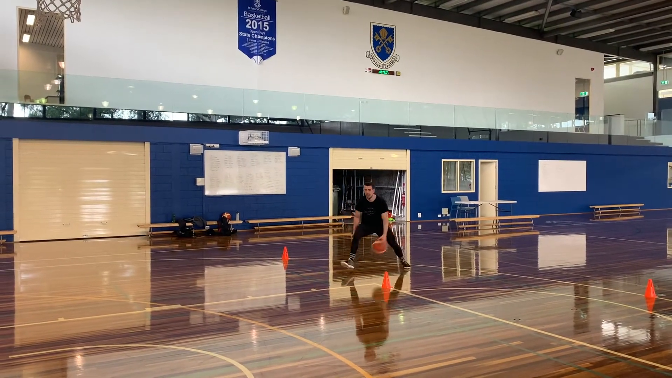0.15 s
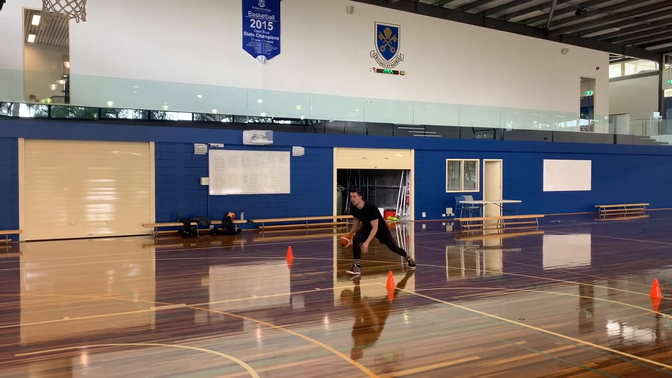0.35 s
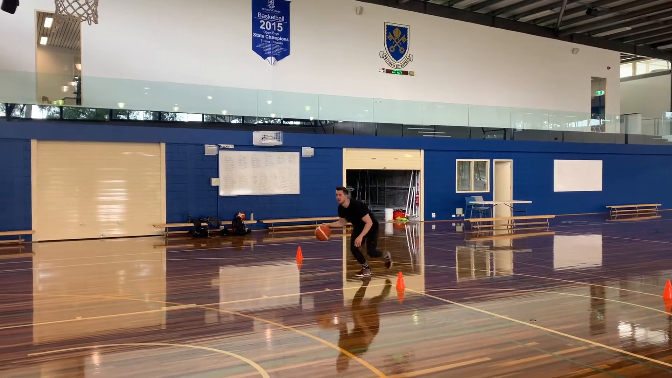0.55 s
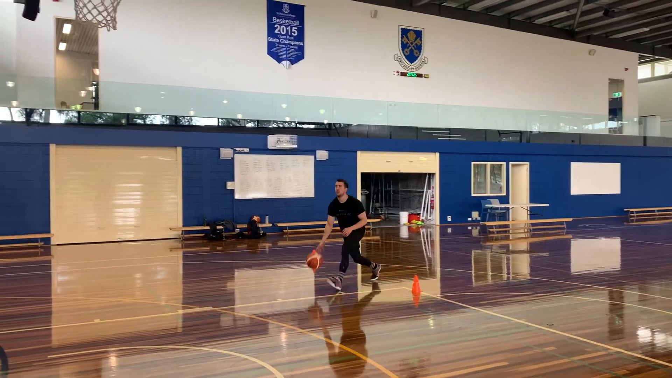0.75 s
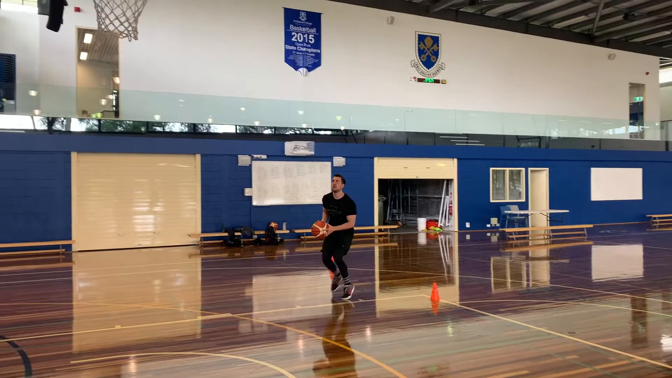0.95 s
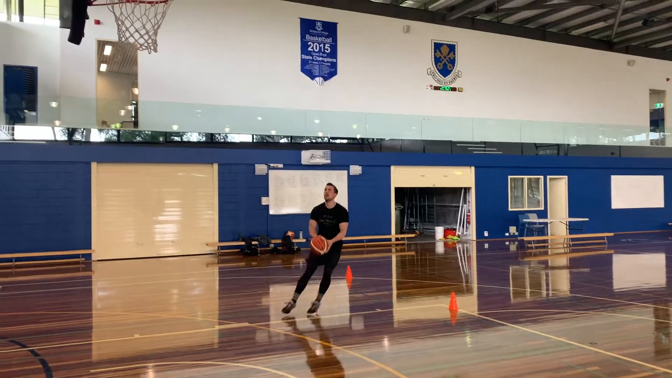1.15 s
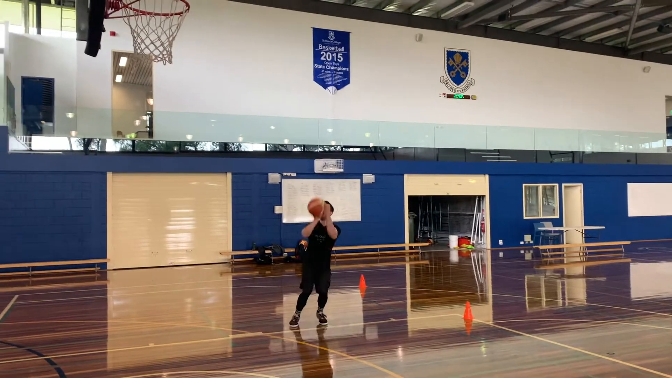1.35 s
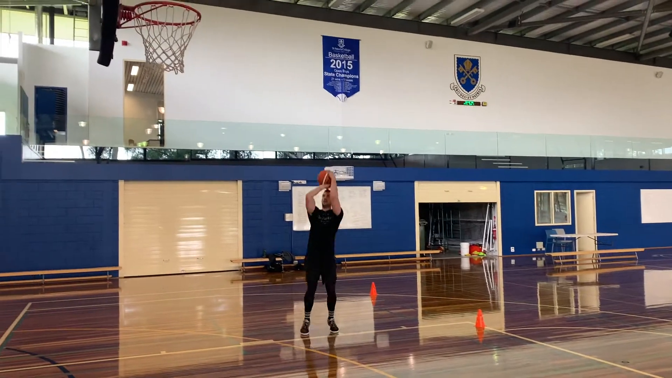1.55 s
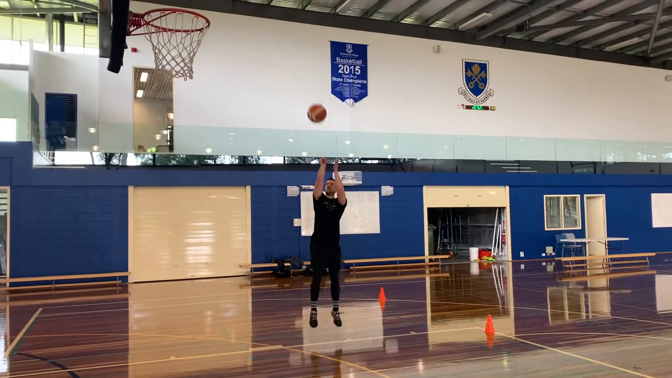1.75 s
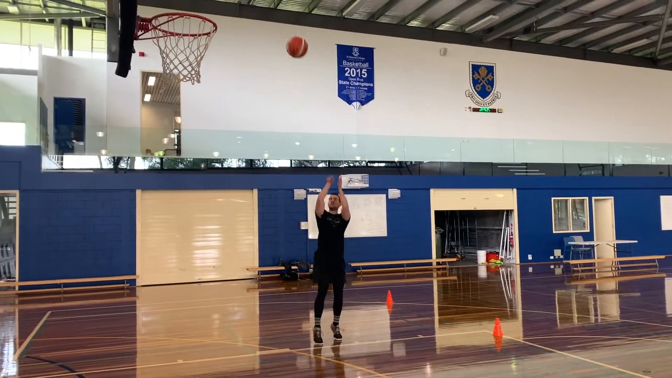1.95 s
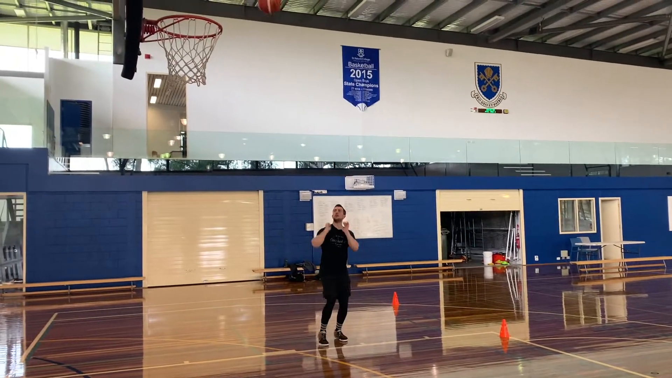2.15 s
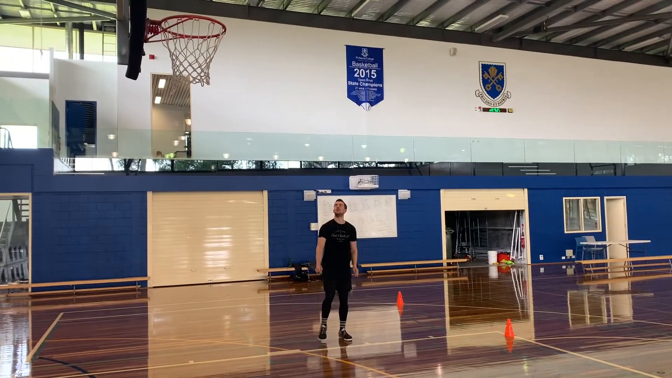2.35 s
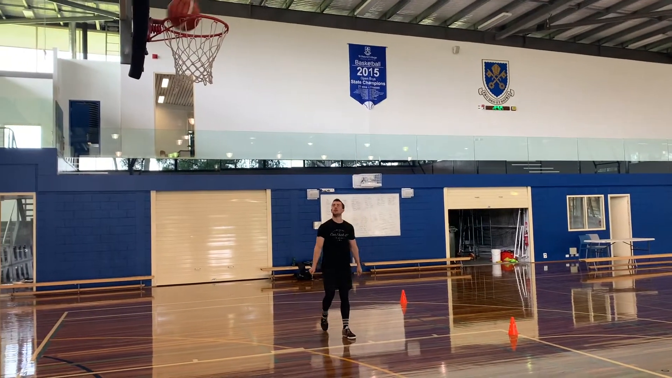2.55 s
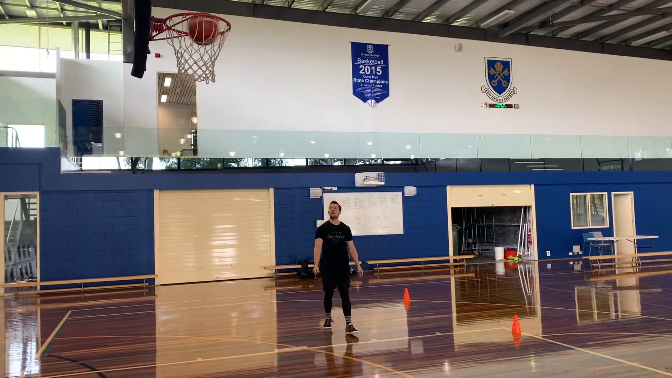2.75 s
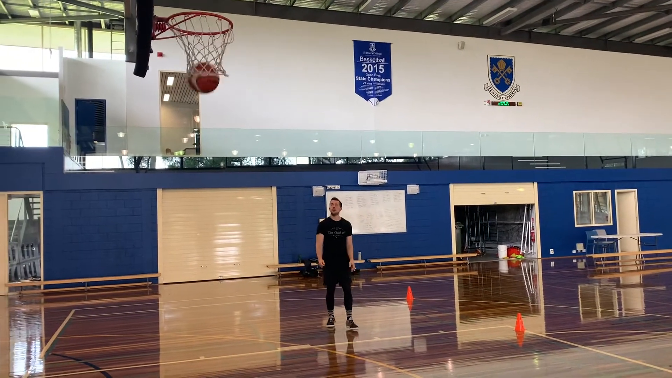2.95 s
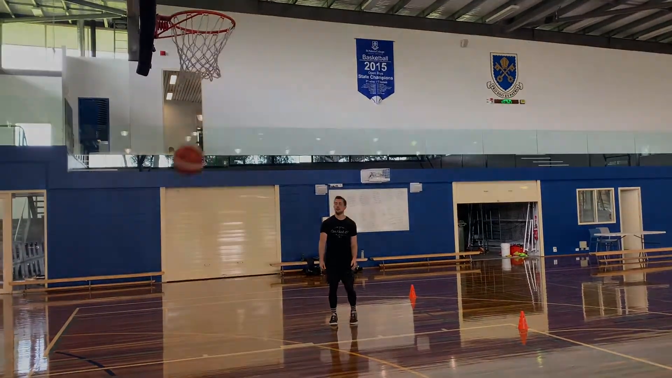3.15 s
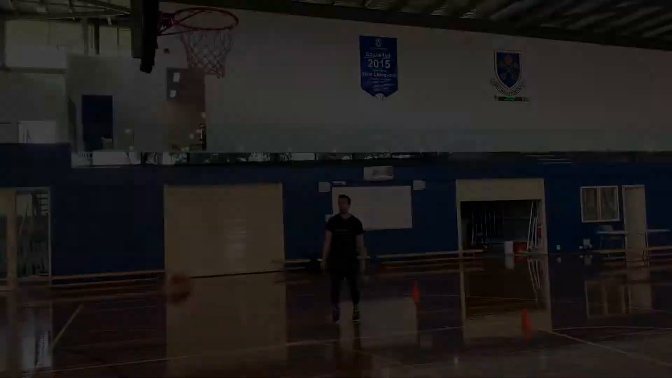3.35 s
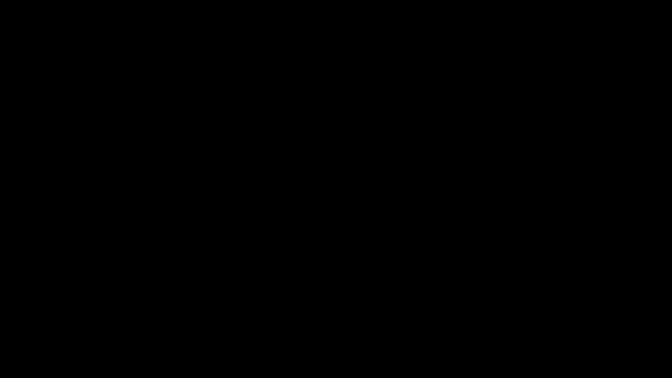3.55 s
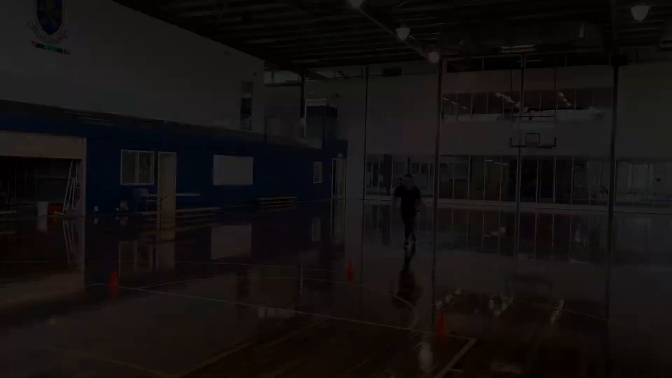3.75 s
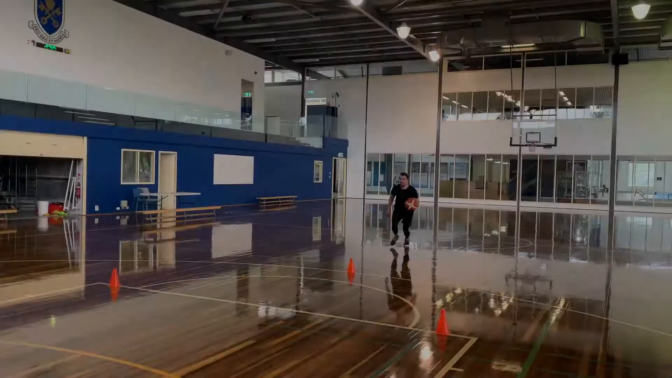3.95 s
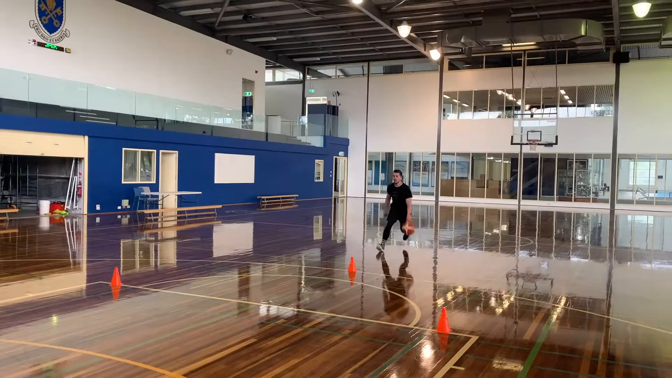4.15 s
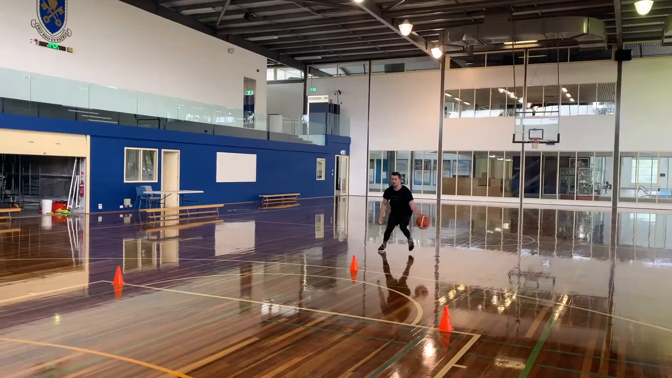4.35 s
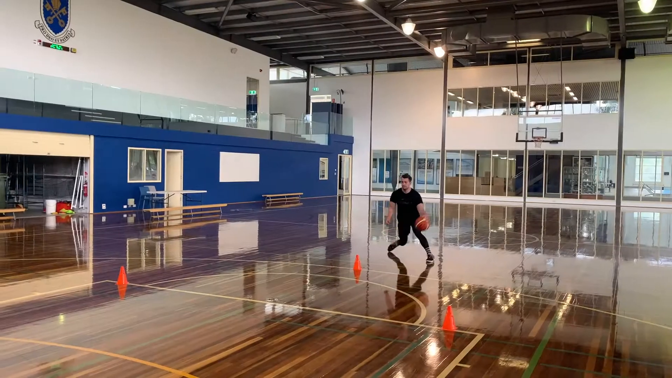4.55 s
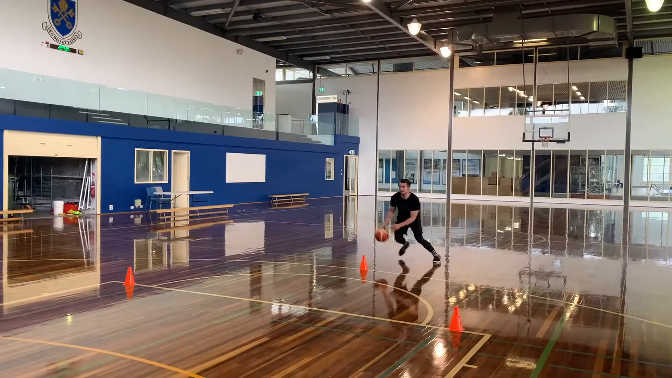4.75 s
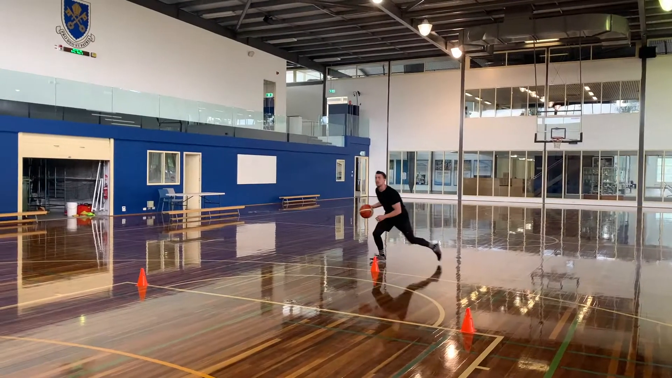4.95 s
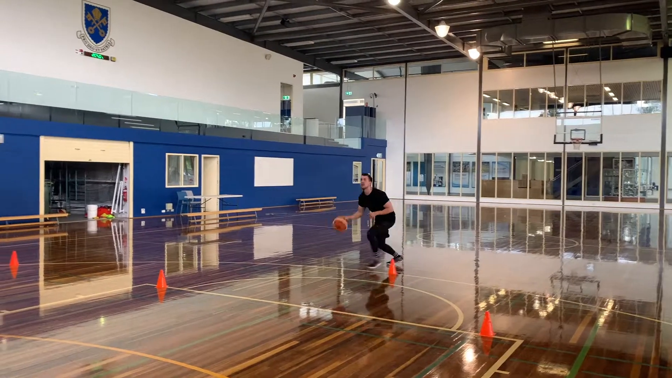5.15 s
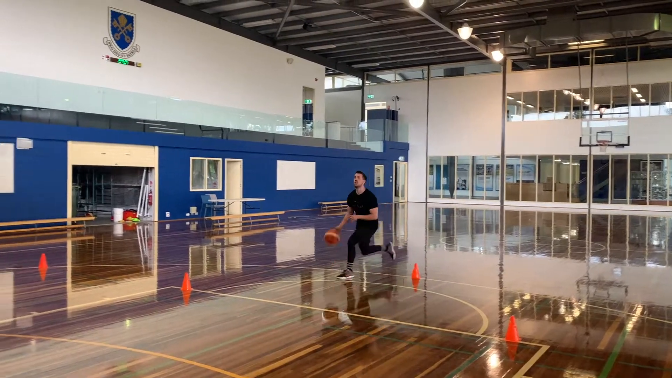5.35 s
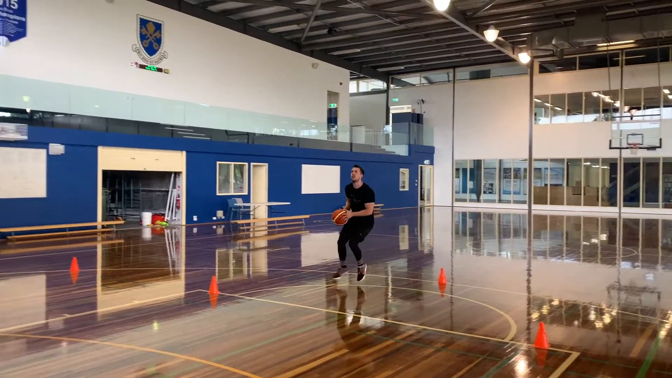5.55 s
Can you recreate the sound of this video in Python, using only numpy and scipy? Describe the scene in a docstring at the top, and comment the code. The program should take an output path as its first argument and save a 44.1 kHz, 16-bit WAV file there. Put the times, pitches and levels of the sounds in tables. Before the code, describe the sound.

A big, bright, echoing sports hall with a steady low ventilation rush, heard in stereo from some distance. The tail of an earlier bounce and squeak already hangs in the air. Around 0.1 s come tiny high shoe chirps, then a lighter basketball bounce at 0.2 s and a strong, ringing one at 0.7 s, with slap, shell ping and woody floor boom. Soft pats fall at 0.8 and 1.1 s, with fainter squeaks near 1.2 s. Two soles land flat and dull at 1.9 s. At 2.55 s the ball knocks the hoop, which rattles and rings steely; the net rasps and snaps until about 2.9 s. The ball thumps the floor at 3.5 s, its reverberation dipping in level until about 4.1 s. Dribbling returns with bounces at 4.2, 4.7 and, sharpest and most pinging, 5.25 s, among dull taps of shoes and hands around 4.2, 4.4, 4.5 and 4.9 s. Long reverberation follows.

```python
"""A player dribbles a basketball on the sprung wooden floor of a big sports hall, over a low ventilation rush.
Shoe squeaks, shaky gliding tones, and rubber-and-boards bounces open it; soft pats and fainter squeaks follow.
The player lands flat from a jump; the ball knocks the hoop, a burst of noise and ringing steel modes, and
swishes through the net, a rasp of rubbed noise and cord twangs. It drops and is dribbled again among pats.
Each bounce is a short noise slap, a shell ping and a boom of floor modes, with echoes and a long noise tail."""
import sys
import numpy as np
from scipy import signal
from scipy.fft import rfft, irfft, next_fast_len
from scipy.io import wavfile
from scipy.ndimage import uniform_filter1d

SR = 44100
rng = np.random.default_rng(int(sys.argv[2]) if len(sys.argv) > 2 else 0)


def wav_record(signal):
    """Record a signal, one row per channel, as 16-bit PCM in the file named by sys.argv[1]."""
    frames = np.transpose(np.atleast_2d(signal))
    bounded = np.clip(frames, -1, 1)
    # unit amplitude maps onto the largest positive 16-bit level
    quanta = np.round(bounded * 32767).astype(np.int16)
    wavfile.write(sys.argv[1], SR, quanta)


N = 250929  # samples heard
LEAD = SR  # samples run ahead of the scene, so that earlier sounds still ring at its start
PING_RISE_S = .008  # the shell's ping peaks this long after its first sample

# slap of rubber on varnish: (frequency [Hz], level [dB])
SLAP_SPECTRUM = [(150, -2), (400, 17), (700, 3), (1100, 10.5), (2500, 5), (4500, 0), (7000, -1.5),
                 (9500, -0.5), (13000, -7.5), (15500, -2)]
# the ball against the hoop: (frequency [Hz], level [dB])
KNOCK_SPECTRUM = [(100, 4), (400, 6), (700, -4), (1150, 7.5), (2000, -14), (4500, -16), (7500, -8.5),
                  (15000, -16)]
# hollow knock of a flat pat or sole: (frequency [Hz], level [dB], t60 [s])
HOLLOW_MODES = [(990, -11, 0.016), (2070, -8.5, 0.012), (2300, -19.5, .024), (3000, -20, 0.029)]


def amp(db):
    """Turns decibels into a linear gain."""
    return 10 ** (np.asarray(db) / 20)


def unit(x):
    """Scales to an rms of one."""
    return x / np.sqrt(np.mean(x ** 2) + 1e-20)


def read(points, hz):
    """Reads a table on a log-frequency axis."""
    f, value = np.transpose(points)
    return np.interp(np.log(hz + 1), np.log(f + 1), value)


def add(mix, s, sound):
    """Mixes a sound in at s seconds from the start of the mix."""
    part = mix[:, max(round(s * SR), 0):][:, :sound.shape[-1]]
    part += sound[..., :part.shape[1]]


def convolve(x, taps):
    """Convolves channel by channel; a mono part serves both channels."""
    return signal.fftconvolve(np.atleast_2d(x), np.atleast_2d(taps), axes=1)


def colour(x, points, size=2048):
    """Minimum-phase filter with the given spectrum, so nothing sounds ahead of its attack."""
    log_gain = np.log(amp(read(points, abs(np.fft.fftfreq(size, 1 / SR)))))
    taps = np.fft.ifft(np.exp(np.conj(signal.hilbert(log_gain)))).real
    return convolve(x, taps[:size // 2])[:, :x.shape[-1]]


def ring(modes, length, wave=np.sin):
    """A sum of dying sines, one for each resonance of a body."""
    t = np.arange(int(length * SR)) / SR
    return sum(amp(db - 60 * t / t60) * wave(2 * np.pi * hz * t) for hz, db, t60 in modes)


def diffuse(size, apart_hz=520):
    """Stereo white noise: alike in the bass, unrelated in the treble."""
    full = next_fast_len(size)
    mid, side = rfft(rng.standard_normal((2, full)))
    angle = np.pi / 4 * np.tanh(0.16 + np.fft.rfftfreq(full, 1 / SR) / apart_hz)
    pair = mid * np.cos(angle) + np.array([[1], [-1]]) * side * np.sin(angle)
    return irfft(pair, full)[:, :size]


def ventilation(level_db=-51):
    """The steady low rush of the building: noise with a fixed spectrum."""
    # (frequency [Hz], level [dB])
    air_spectrum = [(15, -53.5), (25, -25), (102, 0), (301, -12), (659, -26), (988, -17.5), (1740, -21),
                    (4870, -36.5), (7110, -55.5), (8360, -74), (11000, -48.5), (16000, -76)]
    return amp(level_db) * unit(colour(diffuse(LEAD + N), air_spectrum))


def hall(x, onset=0.014, build=0.016, patchy_db=2.6, size=120000):
    """Diffuse tail, drawn anew at each call, whose every band dies at its own rate."""
    # tail spectrum: (frequency [Hz], level [dB])
    tail_spectrum = [(50, -4), (110, 0.5), (220, -4), (400, -5.5), (700, -2.5), (1000, -2.5), (1800, 0),
                     (4200, 1), (6500, -3.5), (8500, -7.5), (11000, -10.5), (16000, -24)]
    # reverberation time: (frequency [Hz], t60 [s])
    tail_t60 = [(60, 2.2), (150, 3.17), (400, 2.82), (1000, 3.13), (2500, 3.8), (4500, 3.39), (7000, 1.69),
                (10000, 0.69), (16000, 1.3)]
    hz, t, z = signal.stft(diffuse(size), SR, nperseg=512, noverlap=256)
    t60 = read(tail_t60, hz)[:, None]
    even_energy = np.sqrt(2 * np.log(1000) / (t60 * SR))  # a slow band gets no more energy than a quick one
    z = z * amp(read(tail_spectrum, hz)[:, None] - 60 * t / t60) * even_energy
    # single notes swell and fade in the tail
    swell = unit(uniform_filter1d(rng.standard_normal(z.shape), size=14, axis=1))
    z = z * unit(amp(patchy_db * swell))
    tail = signal.istft(z, SR, nperseg=512, noverlap=256)[1][:, :size]
    return convolve(x, tail * np.clip((np.arange(size) / SR - onset) / build, 0, 1))


def walls(x, scatter_t60=0.23, scatter_db=2.0, rise=0.025, near=0.47, hard_db=-1.5, hard_t60=.3,
          haze_db=-9, split_hz=600, size=14000):
    """The direct sound, a dense bass wash from floor and stands, and hard reflections from beams and walls."""
    # spectrum of all reflections: (frequency [Hz], level [dB])
    scatter_spectrum = [(60, -11.5), (200, -3), (400, -1), (1000, -6), (3000, -8), (6000, -8), (10000, -11),
                        (16000, -14)]
    # echoes from the roof and the far walls: (delay [s], level before the scatter spectrum [dB])
    far_echoes = [(0.044, -11.5), (0.0513, -9.5), (0.061, -14.5), (0.079, -18), (0.156, -11.5)]
    reflections, first_s, span_s, range_db = 60, .009, .22, 14  # small hard reflections

    t = np.arange(size) / SR
    shape = np.clip((t - .016) / rise, near, 1) * amp(-60 * t / scatter_t60)
    clumps = unit(uniform_filter1d(rng.standard_normal(size), size=90))
    shape = shape * amp(5.5 * clumps)  # the wash arrives in clumps
    wash = amp(scatter_db) * diffuse(size) * shape / np.linalg.norm(shape)

    hard = np.zeros((2, size))
    for when, weakness, left, right in rng.uniform(size=(reflections, 4)):
        s = first_s + when * span_s
        at = round(s * SR) + (np.array([left, right]) * 24).astype(int)  # each channel at its own moment
        level = min(s / (0.014 + rise), 1) * amp(-range_db * weakness - 60 * s / hard_t60)
        hard[[0, 1], np.clip(at, 0, size - 1)] += level
    hard *= amp(hard_db) / np.linalg.norm(hard[0])

    bass = signal.lfilter(*signal.butter(2, split_hz, fs=SR), wash)
    treble = signal.lfilter(*signal.butter(2, split_hz, "highpass", fs=SR), hard + amp(haze_db) * wash)
    spray = bass + treble
    for s, db in far_echoes:
        at = round((s + rng.uniform(-.002, .002)) * SR) + rng.integers(-12, 13, 2)
        spray[[0, 1], np.clip(at, 0, size - 1)] += amp(db)
    taps = colour(spray, scatter_spectrum)
    taps[:, 0] += 1  # the direct sound
    return convolve(x, taps)


def crack(decay, spectrum=SLAP_SPECTRUM, size=20000):
    """A very short burst of contact noise, fading by e in the decay time [s]."""
    shape = np.exp(-np.arange(size) / SR / decay)
    burst = diffuse(size) * shape
    even = np.linalg.norm(shape) / np.linalg.norm(burst, axis=1, keepdims=True)
    return colour(burst * even, spectrum)


def click(spectrum, size=20000):
    """A contact as the whole hall hears it: its ripples average out over all directions."""
    return colour(signal.unit_impulse(size), spectrum)[0]


def ticks(per_s, size):
    """Randomly timed clicks of uneven strength."""
    struck = rng.random(size) < per_s / SR
    return struck * rng.choice([-1, 1], size) * rng.uniform(.3, 1, size)


def thump(depth_db=0, squash_s=0.00816, squash_width=0.0033, squash_hz=205, squash_db=-10,
          board_s=0.0052, swing_s=0.0061, pivot_hz=130, size=20000):
    """A contact gives way and springs back, pushing the air and setting the boards swinging."""
    # sprung floor before each spot's own tuning: (frequency [Hz], level [dB], t60 [s])
    board_modes = [(59.3, -38, 0.33), (91.1, -27.5, 0.72), (112.6, -12.5, 0.21), (143.5, -20, 0.3),
                   (168.8, -29.5, 0.51), (215.4, -19.5, 0.061), (253.7, -20, 0.12), (409.6, -31, .12)]
    t = np.arange(size) / SR - squash_s
    push = amp(squash_db) * np.exp(-(t / squash_width) ** 2) * np.cos(2 * np.pi * squash_hz * t)
    spot = rng.uniform(0.909, 1.03, len(board_modes))  # each spot is tuned a little differently
    modes = [(hz * k, db - depth_db * np.log2(hz / pivot_hz), t60)
             for (hz, db, t60), k in zip(board_modes, spot)]
    swing_in = 1 - np.exp(-np.arange(size) / SR / swing_s)
    boards = ring(modes, .5)[:size] * swing_in
    return push + np.pad(boards, (round(board_s * SR), 0))[:size]


def squeaks(third_db=-22, hall_db=1.5, hall_octave_db=-7, lag_rad=0.72, jitter=.022, rough_db=2.6):
    """Rubber sticks and slips on varnish: shaky whistles whose overtones beam more than they fill the hall."""
    # one slip a row: (time [s], length [s], mid pitch [Hz], fall [share of pitch], level [dB],
    #                  octave overtone [dB relative to the whistle])
    slips = [(-.13, 0.069, 4267, 0.1192, -32.5, -30), (-.05, 0.033, 4680, 0.1, -34.5, -25),
             (0.075, 0.0094, 4406, 0.092, -34, 8), (0.098, 0.013, 4490, 0.055, -35.5, -6),
             (0.104, 0.025, 4360, 0.05, -36, -10), (1.166, 0.057, 4650, 0.023, -49, -27),
             (1.176, 0.032, 5010, 0.0453, -50.5, -24), (1.208, .045, 4920, 0.014, -49, -32)]
    out, sent = np.zeros((2, 2, LEAD + N))
    for s, length, hz, fall, db, octave_db in slips:
        u = np.linspace(0, 1, int(length * SR))
        shake, grip = unit(uniform_filter1d(rng.standard_normal((2, len(u))), size=90))  # unsteady sole
        phase = 2 * np.pi * np.cumsum(hz * (1 + jitter * shake - fall * (u - .5))) / SR
        level = amp(db) * unit(amp(rough_db * grip)) * signal.windows.tukey(len(u), .5)
        pair = phase - np.array([[0], [lag_rad]])  # reaches the right channel a little later
        overtones = amp(octave_db) * (np.sin(2 * pair) + amp(third_db) * np.sin(3 * pair))
        add(out, s + LEAD / SR, level * (np.sin(pair) + overtones))
        hall_octave = amp(hall_octave_db + octave_db) * np.sin(2 * phase)
        add(sent, s + LEAD / SR, level * (np.sin(phase) + hall_octave))
    return out + amp(hall_db) * hall(sent[0])[:, :LEAD + N]


def pats(tap_db=-12, spread_db=2, hall_db=-2, wall_s=0.038, wall_db=-12):
    """Shoes on boards and hands on the ball: a dulled tap and a hollow knock over a small thud."""
    # (time [s], tap before tap_db or spread_db [dB], thud [dB], low-pass edge [Hz], hollow knock [dB])
    contacts = [(0.837, -24, -16, 4970, -53), (1.137, -8.5, -19.5, 2270, -37),
                (1.992, -20, -28.5, 6800, -58), (4.181, -11, -17.5, 4980, -29.5),
                (4.204, -21, -44, 4540, -44), (4.379, -13, -33.5, 6960, -49),
                (4.524, -10, -20.5, 8550, -26), (4.896, -12, -21.5, 4980, -57)]
    # a shoe on the boards: (frequency [Hz], level [dB])
    pat_spectrum = [(150, 8), (400, 0), (650, -4.5), (1000, 13.5), (1500, -15), (2100, -3), (3500, -0.5),
                    (7000, -11), (15000, -10)]
    out, sent = np.zeros((2, 2, LEAD + N))
    for s, db, thud_db, edge_hz, knock_db in contacts:
        at = s + LEAD / SR
        dull = signal.butter(3, edge_hz, fs=SR)
        thud = amp(thud_db) * thump()
        tap = amp(tap_db + db) * signal.lfilter(*dull, crack(decay=0.0015, spectrum=pat_spectrum))
        pat = tap + thud + amp(knock_db) * ring(HOLLOW_MODES, .5)[:len(thud)]
        add(out, at, walls(pat))
        add(out, at + wall_s, amp(wall_db) * pat)
        add(sent, at, amp(spread_db + db) * signal.lfilter(*dull, click(pat_spectrum)) + thud)
    return out + amp(hall_db) * hall(sent[0])[:, :LEAD + N]


def landing(knock_db=-4, spread_db=2, hall_db=-2, wall_s=0.027, wall_db=-16):
    """After the jump each sole comes down flat: a full, dull slap and a quick thud of the boards."""
    # (time [s], slap [dB], thud [dB])
    soles = [(1.9244, -28.5, -32), (1.9431, -26.5, -24)]
    # a whole sole slapping the boards: (frequency [Hz], level [dB])
    sole_spectrum = [(150, 3.5), (400, 8.5), (670, -0.5), (1140, 11.5), (1580, -2.5), (2120, 3), (3100, -4),
                     (3600, -17), (6400, -33), (15000, -42)]
    out, sent = np.zeros((2, 2, LEAD + N))
    for s, slap_db, thud_db in soles:
        at = s + LEAD / SR
        knock = amp(knock_db) * ring(HOLLOW_MODES, .5)[:20000]
        slap = amp(slap_db) * (crack(decay=0.0019, spectrum=sole_spectrum) + knock)
        thud = amp(thud_db) * thump(squash_s=.0055, squash_hz=250, board_s=.003)
        add(out, at, walls(slap + thud))
        add(out, at + wall_s, amp(wall_db) * slap)
        add(sent, at, amp(spread_db) * slap + thud)
    return out + amp(hall_db) * hall(sent[0])[:, :LEAD + N]


def rattle(per_s=360, level_db=-23, t60=0.93, edge_hz=1400, size=22000):
    """Dull, dying chatter of the hoop in its bracket: random ticks shaped as small knocks."""
    chatter = ticks(per_s, size) * amp(level_db - 60 * np.arange(size) / SR / t60)
    dull = signal.butter(3, edge_hz, fs=SR)
    return signal.lfilter(*dull, convolve(chatter, crack(decay=0.0021, spectrum=KNOCK_SPECTRUM)))


def twangs(size, per_s=30, t60=.025, count=70, low_hz=250, high_hz=7000):
    """Each cord slips over the ball per_s times a second on average, a short, dry zip at its own pitch."""
    total = 0
    for hz in np.linspace(low_hz, high_hz, count):
        side_signs = rng.choice([-1, 1], (2, 1))
        total = total + side_signs * convolve(ticks(per_s, size), ring([(hz, 0, t60)], .1))[:, :size]
    return total


def swish(before=.06, length=.5, in_s=2.605, hold_s=0.24, level_db=-35, snap_share=.45, cords_low_hz=109):
    """Cords rasp and snap over the ball, less as it slows, then let go; returns (start [s], sound)."""
    # rub and snap of the cords: (frequency [Hz], level [dB])
    cord_spectrum = [(100, 8.5), (300, 6.5), (600, -5.5), (1000, -0.5), (1900, 0.5), (2750, -5.5),
                     (3450, -3), (4000, -5.5), (5250, -5.5), (6400, -9), (7300, -9), (8500, -16),
                     (10500, -16.5), (13500, -32), (15500, -44)]
    # cords tighten as the ball enters, drags and squeezes through the neck:
    # (time [s], level [dB], half-width to 1/e of the dB [s])
    surges = [(2.634, 4.5, 0.034), (2.755, 3, 0.031), (2.842, 5.5, 0.032)]
    rise, sag, release = 512.5, 29.5, 183  # dB per s
    t = np.arange(-before, length, 1 / SR)
    slope_db = (rise * np.minimum(t, 0) - sag * np.maximum(t, 0)
                - release * np.maximum(t - hold_s, 0))
    surge_db = sum(db * np.exp(-((in_s + t - s) / width) ** 2) for s, db, width in surges)
    jerks = amp(2.0 * unit(uniform_filter1d(rng.standard_normal(len(t)), size=200)))
    rub = unit(colour(diffuse(len(t)) * jerks, cord_spectrum))
    snaps = unit(colour(twangs(len(t)), cord_spectrum))
    blend = np.sqrt(1 - snap_share) * rub + np.sqrt(snap_share) * snaps
    light = signal.butter(2, cords_low_hz, "highpass", fs=SR)  # thin cords carry no deep bass
    rasp = unit(signal.lfilter(*light, blend))
    return in_s - before, rasp * amp(level_db + slope_db + surge_db)


def basket(hall_db=-1, thud_decay=0.015, tap_db=-11, tap_per_db=1.86):
    """The ball knocks the hoop and sets it rattling, the cords rasp in small jerks, and all ring the steel."""
    # the ball meets the hoop, then jerks the net against it: (time [s], force [dB])
    knocks = [(2.543, -5.5), (2.608, -12.5), (2.635, -15), (2.682, -10), (2.731, -16), (2.775, -17.5),
              (2.821, -14)]
    # backboard stand and steel hoop: (frequency [Hz], level [dB], t60 [s])
    hoop_modes = [(61, -59, 1.5), (87, -59.5, 1.1), (162, -63, .45), (205, -59, .45), (410, -54, .2),
                  (1000, -49.5, .1), (1550, -53, .15), (1805, -52, .16), (2395, -53, .17),
                  (3250, -48.5, .2), (3495, -47, .22), (3607, -53, .2), (4140, -54, .17), (4441, -55, .15),
                  (4615, -52, .15), (5240, -49, .2), (5497, -52, .18), (5906, -52, .18), (6483, -55, .17),
                  (6706, -54, .17), (7013, -52, .17), (7439, -54, .15)]
    out = np.zeros((2, LEAD + N))
    for s, force_db in knocks:
        thud = thump()
        thud *= np.exp(-np.arange(len(thud)) / SR / thud_decay)
        # the tap grows faster than the force
        tap = amp(tap_db + tap_per_db * force_db) * crack(decay=0.0068, spectrum=KNOCK_SPECTRUM)
        add(out, s + LEAD / SR, tap + amp(force_db) * thud)
    add(out, knocks[0][0] + LEAD / SR, rattle())
    start, rasp = swish()
    add(out, start + LEAD / SR, rasp)
    out = out + convolve(out, ring(hoop_modes, 1.0, np.cos))[:, :LEAD + N]
    return out + amp(hall_db) * hall(out[0])[:, :LEAD + N]


def ping(swell_s=0.0019, width=0.003, hz=1020, fall=0.037, level_db=-17, size=20000):
    """The rubber shell's note swells and sags as the ball flattens; it peaks PING_RISE_S after its start."""
    t = np.arange(size) / SR - PING_RISE_S
    pitch = hz * np.exp(-np.clip(t, -.01, .01) / fall)
    swell = np.exp(-abs(t) / np.where(t < 0, swell_s, width))
    return amp(level_db) * swell * np.sin(2 * np.pi * np.cumsum(pitch) / SR)


def bounces(crack_db=-14, echo_gain_db=-11, round_s=0.001055, again_db=-3, fresh_db=-4, spread_db=3, count=4):
    """The slap runs to and fro inside the ball, the shell pings, and the floor booms."""
    # (time [s], force [dB], hall [dB], roof echo [dB], left over right [dB], nearest wall's echo delay [s],
    #  its slap [dB], depth of the boards' note [dB per octave], shell's ping before its own level [dB],
    #  ping's peak delay [s])
    hits = [(-.24, 0.5, 3, -10, -4, 0.023, -9, -4.5, -0.5, .002),
            (0.2196, -6.5, 2.5, -12, 0.5, 0.017, -13, 0, -13, 0.013),
            (0.6946, -1.5, 0.5, -14, 2.5, .0197, -8, -1, -3.5, 0.00414),
            (3.4854, -0.5, -2.5, -20, 2, 0.018, -8, 1, -13.5, 0.0024),
            (4.2266, -3, 1, -23, 0, .0216, -8, 1.5, -11, .010),
            (4.6753, -2.5, 0.5, -18, -0.5, 0.021, -12, -2, -10, .003),
            (5.2575, 0, 1.3, -1, -1.5, .0203, -6.5, 0, -3.5, 0.00116)]
    # air modes inside the ball, before the force: (frequency [Hz], level [dB], t60 [s])
    ball_modes = [(1800, -26.5, 0.015), (3370, -15, 0.0024), (988, -48, 0.45), (1390, -44, 0.32),
                  (2085, -64, 0.19), (2400, -47, 0.13), (3100, -48, 0.42)]
    # hard echoes off stands and beams: (time [s], level before echo_gain_db and the bounce's force [dB])
    slapbacks = [(0.2592, -22), (.2965, -16), (.735, -11), (.739, -8), (.7485, -6), (0.7756, -26),
                 (3.5205, -14), (3.5373, -16), (3.546, -17), (3.552, -13), (3.651, -20), (4.2516, -12),
                 (4.259, -19), (4.266, -16), (4.2773, -15), (4.287, -16), (4.378, -22), (4.3847, -17),
                 (4.702, -10), (4.727, -17), (4.7376, -21), (4.762, -18.5), (4.8308, -22), (5.293, -15),
                 (5.2985, -10.5), (5.3039, -13), (5.3153, -8), (5.324, -18), (5.34, -9)]
    # a harder bounce rings the air in the ball much more but thumps slightly less than in proportion
    ring_base_db, ring_per_db = -2, 4.5
    thump_base_db, thump_per_db = -1, 0.86
    wall_thump_db, roof_s, slapback_within_s = -13, 0.04, .2

    out = np.zeros((2, LEAD + N))
    for s, force_db, hall_db, roof_db, pan_db, wall_s, wall_db, depth_db, ping_db, ping_s in hits:
        at, pan = s + LEAD / SR, amp([[pan_db / 2], [-pan_db / 2]])
        contact = crack(decay=0.00051)
        slap = contact.copy()
        add(slap, round_s, amp(fresh_db) * crack(decay=0.0014))  # more skin meets the varnish
        for k in range(1, count):  # each round trip comes back weaker and duller
            contact = amp(again_db) * uniform_filter1d(contact, size=5)
            add(slap, k * round_s, contact)
        slap = amp(crack_db + force_db) * slap

        shell = amp(ping_db) * ping()
        boom = amp(thump_base_db + thump_per_db * force_db) * thump(depth_db)
        air = amp(ring_base_db + ring_per_db * force_db) * ring(ball_modes, .5)[:len(shell)]
        body = boom + air
        add(out, at, pan * walls(slap + body))
        add(out, at + wall_s, pan * (amp(wall_db) * slap + amp(wall_thump_db) * body))
        for echo_s, echo_db in slapbacks:
            if 0 < echo_s - s < slapback_within_s:
                echo = uniform_filter1d(crack(decay=0.00061), size=5)
                add(out, echo_s + LEAD / SR, amp(echo_gain_db + force_db + echo_db) * echo)

        ping_at = at + ping_s - PING_RISE_S
        add(out, ping_at, pan * shell)
        add(out, ping_at + roof_s, amp(roof_db) * shell)  # the ping beams upward and returns from the roof
        sent = amp(spread_db + force_db) * click(SLAP_SPECTRUM) + body + shell
        add(out, at, amp(hall_db) * hall(sent))
    return out


def scene():
    """All sources in the hall, with the lead-in cut away."""
    court = ventilation() + squeaks() + pats() + landing() + basket() + bounces()
    return court[:, LEAD:]


def record(dry, edge_hz=16400):
    """Filters set the overall tone, the stereo width by band and the left-right balance; the level dips for a
    while between the dropped ball's bounce and the new dribble."""
    # overall tone, low roll-off and an uneven treble with a dip near 8.5 kHz: (frequency [Hz], level [dB])
    overall_tone = [(10, -47), (25, -32.5), (40, -0.5), (60, 6), (90, -1.5), (7500, -2), (8500, -14),
                    (10000, 0.5), (11500, -2.5), (13500, -10), (15500, -7)]
    # stereo width, swinging from band to band in the treble: (frequency [Hz], side gain [dB])
    side_gain = [(300, -1.5), (600, 4), (5300, -1), (6500, 0.5), (7400, -3), (8500, 19.5), (9200, 4),
                 (10000, -2), (10800, -9.5), (12200, -2), (13400, 13), (14300, -1), (15500, -9)]
    # left over right: (frequency [Hz], level difference [dB])
    balance = [(60, 3), (250, 0.5), (600, 5), (1200, 3), (2500, 1), (5000, -1), (10000, -0.5)]
    # the level dips after the dropped ball's bounce and comes back for the new dribble: (time [s], level [dB])
    level_moves = [(3.501, 5.5), (3.801, -0.5), (4.1, -0.5), (4.199, 6.5)]
    hz = np.fft.rfftfreq(2 * 2 ** 18, 1 / SR)
    halves = np.array([[.5], [-.5]])
    left, right = rfft(colour(dry, overall_tone, size=16384), 2 * (len(hz) - 1))
    pair = (left + right) / 2 + halves * (left - right) * amp(read(side_gain, hz))
    heard = irfft(pair * amp(halves * read(balance, hz)))[:, :N]
    faded = heard * amp(np.interp(np.arange(N) / SR, *np.transpose(level_moves)))
    low_pass = signal.firwin(255, edge_hz, window=("kaiser", 9), fs=SR)  # limits the band
    return signal.oaconvolve(faded, low_pass[None], "same")


dry = scene()
out = record(dry)
wav_record(out)
```